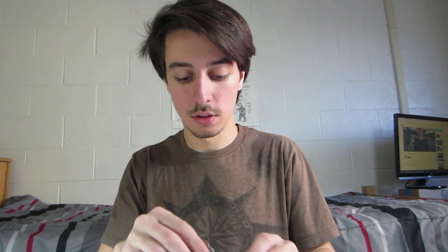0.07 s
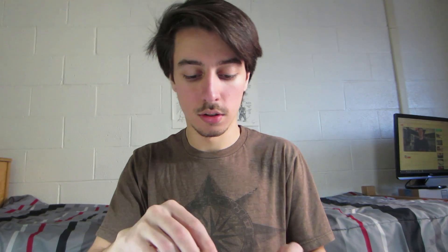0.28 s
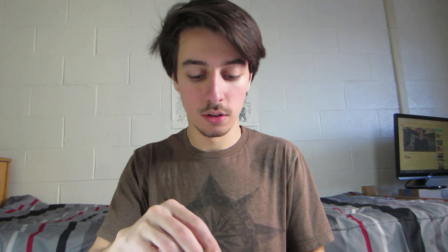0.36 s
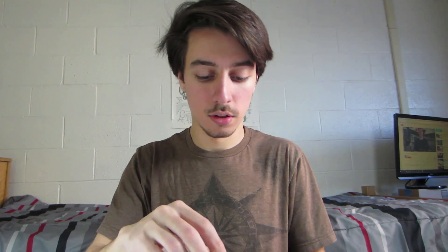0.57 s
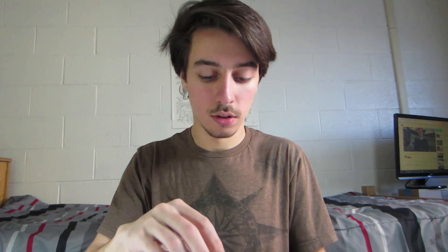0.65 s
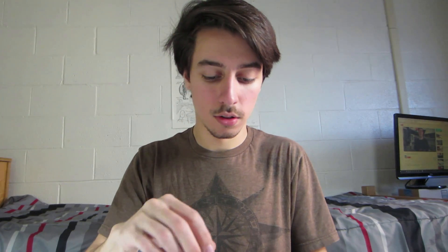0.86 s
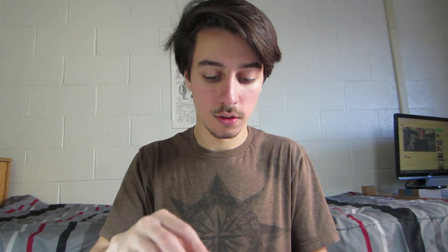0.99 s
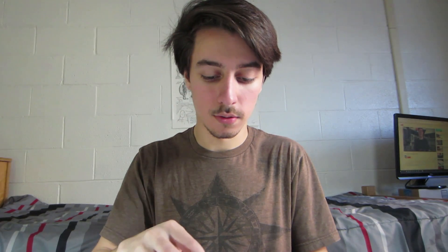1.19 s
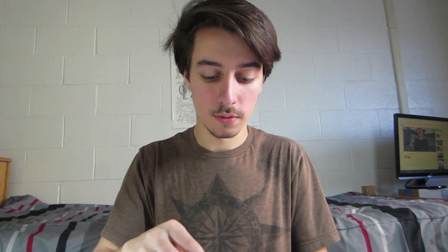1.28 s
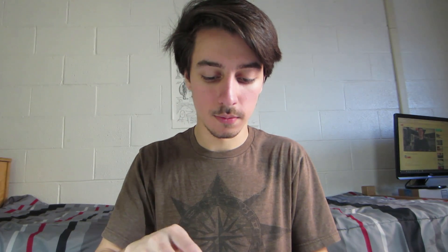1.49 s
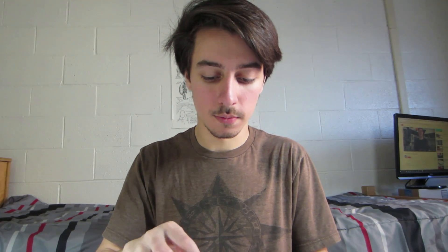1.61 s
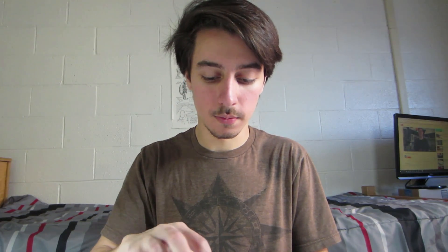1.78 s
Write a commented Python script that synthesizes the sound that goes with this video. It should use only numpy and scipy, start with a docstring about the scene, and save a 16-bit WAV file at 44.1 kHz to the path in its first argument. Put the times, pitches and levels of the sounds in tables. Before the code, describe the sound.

Coins drop into a plastic hopper with hollow knocks, bright clinks and short skids.

```python
"""Coins are slid along and dropped one at a time into a plastic hopper in a small room.
Each impact excites the damped modes of the plastic and the coin: a thump, a click, a high ring.
Between landings the coins skid and chatter, and friction drives a hollow resonance.
The microphone is close, a little to the left of the hopper, over faint room noise and hum."""
import sys
import numpy as np
from scipy import signal
from scipy.fft import rfft, irfft
from scipy.io import wavfile

SR = 44100
rng = np.random.default_rng(int(sys.argv[2]) if len(sys.argv) > 2 else 0)


def wav_out(sig):
    """Save sig, one row per channel (or a flat mono array), as 16-bit PCM at SR to the path in sys.argv[1]."""
    wavfile.write(sys.argv[1], SR, np.round(np.clip(np.atleast_2d(sig).T, -1, 1) * 32767).astype(np.int16))


N = 81585


def amp(db):
    """Decibels to amplitude ratio."""
    return 10 ** (np.asarray(db) / 20)


def unit(x):
    """Normalisation to rms 1."""
    return x / np.sqrt(np.mean(x ** 2) + 1e-20)


def read(points, hz):
    """Interpolation on a log-frequency axis."""
    f, value = np.transpose(points)
    return np.interp(np.log(hz + 1), np.log(f + 1), value)


def add(mix, start_s, sound):
    """Superposition of a delayed sound."""
    part = mix[max(round(start_s * SR), 0):][:len(sound)]
    part += sound[:len(part)]


def colour(x, spectrum, size=4096):
    """Minimum-phase filtering that preserves the power of white noise."""
    gain = unit(amp(read(spectrum, abs(np.fft.fftfreq(size, 1 / SR)))))
    log_response = np.conj(signal.hilbert(np.log(gain + 1e-6)))
    impulse = np.fft.ifft(np.exp(log_response)).real
    return signal.fftconvolve(x, impulse[:size // 2])[:len(x)]


def pair(a, b, correlation):
    """Partial coherence: two channels mixed from independent signals."""
    same = np.clip(read(correlation, np.fft.rfftfreq(len(a), 1 / SR)), -1, 1)
    return np.array([a, irfft(same * rfft(a) + np.sqrt(1 - same ** 2) * rfft(b), len(a))])


def burst(t, decay_s):
    """Exponentially decaying noise with the same energy in every draw."""
    env = np.exp(-t / decay_s)
    noise = env * rng.standard_normal(len(t))
    return noise * np.linalg.norm(env) / np.linalg.norm(noise)


def drift(t, rate_hz):
    """Random modulation: low-pass noise of rms 1."""
    hz = np.fft.rfftfreq(len(t), 1 / SR)
    return unit(irfft(rfft(rng.standard_normal(len(t))) / (1 + (hz / rate_hz) ** 4), len(t)))


def stroke(t, length, rise_s, fall_s):
    """Envelope with linear attack, hold and exponential release."""
    return np.minimum(t / rise_s, 1) * np.exp(-np.maximum(t - length, 0) / fall_s)


# room noise spectrum (frequency [Hz], relative level [dB])
NOISE_SPECTRUM = [(20, -13), (60, -9.5), (130, -8), (200, -5.5), (330, -4), (500, -8.5), (1000, -14),
                  (1300, -20.5), (1900, -27.5), (2800, -42), (4200, -40.5), (6000, -46), (7000, -66.5),
                  (14000, -71.5)]
# left-right likeness of the noise (frequency [Hz], correlation [ratio])
NOISE_CORRELATION = [(25, 0.74), (80, 0.93), (300, 0.96), (600, 0.79), (1200, 0.28), (8000, 0.313)]
def background():
    """Stationary low room noise, with two pure tones: a hum and an electrical whine."""
    shape = amp(read(NOISE_SPECTRUM, np.fft.rfftfreq(N, 1 / SR)))
    noise = irfft(rfft(rng.standard_normal((2, N))) * shape, N)
    phase_per_hz = 2 * np.pi * np.arange(N) / SR
    hum = amp(-62) * np.sin(584 * phase_per_hz)
    whine = amp(-67.5) * np.sin(7910 * phase_per_hz)
    return amp(-51) * unit(pair(*noise, NOISE_CORRELATION)) + hum + whine


# modes of the hopper (frequency [Hz], relative level [dB], T60 [s])
HOPPER_MODES = [(127.6, -5.5, 0.16), (217.7, -3, 0.4), (269.5, -3.5, .17), (358, -10, 0.35),
                (401, -7.5, 0.25), (498, -8.5, 0.17), (687, -16.5, 0.44), (834, -8, 0.068),
                (898, -11, 0.17), (1230, -14.5, 0.14)]
def hopper_knock(t, push_s=0.0006, flex_s=0.00058, rebound_s=0.0082):
    """Elastic response: the hopper's floor gives way and springs back while its modes decay."""
    modes = sum(amp(db - 60 * t / t60) * np.sin(2 * np.pi * hz * t) for hz, db, t60 in HOPPER_MODES)
    modes *= 1 - np.exp(-t / push_s)
    u, v = t / flex_s, np.maximum(t - rebound_s, 0) / flex_s
    flex = u * (2 - u) * np.exp(-u)
    rebound = amp(-1) * v * (2 - v) * np.exp(-v)
    return amp(-7.5) * modes + amp(6.52) * (flex + rebound)


def clink(t, count=6, low_hz=9400, high_hz=12000, decay_s=.004):
    """Impulse response of one coin: a direct click and a few brief high partials."""
    hz, phase = rng.uniform(low_hz, high_hz, (count, 1)), rng.random((count, 1))
    partials = np.sin(2 * np.pi * (hz * t + phase)).sum(0) * np.exp(-t / decay_s)
    band_share, gain = (high_hz - low_hz) / (SR / 2), amp(-2)
    response = gain * np.sqrt(band_share) * partials / np.linalg.norm(partials)
    response[0] += 1
    return response / np.sqrt(1 + gain ** 2)


# resonances of coins rubbing together (frequency [Hz], relative level [dB])
CLANK_MODES = [(2557, -2), (3252, -3), (3760, -2), (4600, -6), (5412, 2), (5900, -1.5)]
def clank(force, width_hz=140):
    """Forced vibration: contact drives the coins' midrange resonances."""
    t = np.arange(SR // 8) / SR
    ring = sum(amp(db) * np.sin(2 * np.pi * hz * t) for hz, db in CLANK_MODES)
    ring *= np.exp(-np.pi * width_hz * t)
    return signal.fftconvolve(force, ring / np.linalg.norm(ring))[:N]


# spectra of thump, clack and a coin's face (frequency [Hz], relative level [dB])
THUMP_SPECTRUM = [(20, -34.5), (60, -22.5), (130, 5.5), (260, 8.5), (480, -5), (900, -8.5), (1500, -23),
                  (3000, -67.5)]
CLACK_SPECTRUM = [(100, -21.5), (800, 4), (1700, -6), (2500, 5), (3600, -7.5), (5500, -2.5), (7000, -11.5),
                  (9000, -2), (13000, -10)]
METAL_SPECTRUM = [(1000, -47), (7000, -33), (9000, -2), (10000, -1), (10800, 1), (11100, -3), (11550, -1),
                  (12300, -1), (13200, -4.5)]
# coin impacts (time [s], thump level [dB], clack level [dB], tick level [dB])
IMPACTS = [(0.031, -53, -76, -46.5), (.172, -63, -56, -34), (0.2043, -16.5, -14.5, -26),
           (0.2124, -24.5, -37, -38.5), (0.219, -26.5, -41, -30.5), (0.2353, -25, -31, -33.5),
           (0.269, -41, -35.5, -31), (0.2975, -28.5, -31.5, -38), (0.337, -40.5, -41, -26.5),
           (0.4935, -33.5, -38, -39), (.505, -49.5, -38.5, -24.5), (0.519, -43.5, -41.5, -27.5),
           (0.569, -47, -57, -30.5), (0.605, -41, -41.5, -29), (0.6134, -36.5, -62.5, -36.5),
           (.713, -21.5, -22, -17), (.7215, -22.5, -34, -44.5), (0.785, -53.5, -33.5, -34.5),
           (0.812, -38.5, -34, -27.5), (1.182, -58, -45, -39), (1.2725, -38, -38.5, -32.5),
           (1.283, -43, -43, -27), (1.293, -38, -41, -32.5), (1.3, -38.5, -57.5, -29),
           (1.418, -50.5, -58, -45.5), (1.5, -66, -53.5, -45.5)]
def impacts(thump_s=0.0075, click_s=0.0018):
    """Impulsive excitation: each landing gives a knock, a dull thump, a clack and a metallic tick."""
    t = np.arange(SR // 2) / SR
    knock = hopper_knock(t)
    plastic, thump, clack, tick = np.zeros((4, N))
    for start, thump_db, clack_db, tick_db in IMPACTS:
        add(plastic, start, amp(thump_db) * knock)
        add(thump, start, amp(thump_db - 3.5) * burst(t, thump_s))
        add(clack, start, amp(clack_db) * burst(t, click_s))
        add(tick, start, amp(tick_db) * signal.fftconvolve(burst(t, click_s), clink(t)))
    metal = amp(-21.5) * clank(clack) + colour(tick, METAL_SPECTRUM)
    return plastic + colour(thump, THUMP_SPECTRUM) + colour(clack, CLACK_SPECTRUM) + metal


# resonances under a skidding coin (frequency [Hz], bandwidth [Hz], relative level [dB])
HOLLOW_MODES = [(690, 23, -6), (828, 57, 2.5), (908, 80, 6), (987, 30, 2)]
def hollow_resonance(force):
    """Resonant filtering: the narrower a mode's bandwidth, the longer it rings."""
    t = np.arange(SR // 4) / SR
    ring = sum(amp(db) * width * np.exp(-np.pi * width * t) * np.cos(2 * np.pi * hz * t)
               for hz, width, db in HOLLOW_MODES)
    ring = signal.sosfilt(signal.butter(2, [500, 1500], "band", fs=SR, output="sos"), ring)
    return signal.fftconvolve(force, ring / np.linalg.norm(ring))[:N]


# spectra of sliding contact (frequency [Hz], relative level [dB])
RUMBLE_SPECTRUM = [(20, -24.5), (70, -11.5), (125, -6), (350, -0.5), (520, -8.5), (800, -10), (2000, -30),
                   (9000, -99)]
SCRAPE_SPECTRUM = [(200, -39), (1100, 11), (1700, 12), (2600, 5.5), (3600, -2.5), (5000, 6), (6600, 1),
                   (9000, -8.5), (13000, -25.5)]
# skids (time [s], duration [s], rumble [dB], hollow ring [dB], scrape [dB], clank [dB], sizzle [dB])
COIN_SKIDS = [(0.094, 0.095, -73, -65, -72, -74, -50), (0.225, 0.017, -26, -29.5, -33.5, -40, -26.5),
              (0.251, 0.016, -51, -38.5, -54, -45, -38.5), (0.294, 0.06, -37, -39, -47.5, -58.5, -37.5),
              (0.488, 0.019, -41, -37, -44.5, -67, -40.5), (0.511, 0.028, -35.5, -41, -50, -56.5, -41.5),
              (.55, 0.059, -53.5, -42.5, -52, -75, -55), (0.726, 0.03, -33, -45, -46.5, -56.5, -43.5),
              (.787, 0.023, -40.5, -40, -52, -72, -61.5), (0.825, 0.043, -39.5, -42, -50.5, -63, -45.5),
              (1.146, 0.053, -45.5, -43, -59.5, -75.5, -63),
              (1.186, 0.094, -46.5, -48.5, -53.5, -62.5, -51), (1.272, 0.035, -42, -39, -49.5, -60, -43),
              (1.304, 0.015, -51.5, -49, -59, -57, -45), (1.403, 0.057, -47.5, -48.5, -61, -74.5, -58),
              (1.496, 0.0067, -49.5, -42.5, -77, -70.5, -53.5)]
def skids(knocks_per_s=2200, spread_db=2):
    """Friction as shot noise: a swarm of tiny random knocks drives the plastic and the metal."""
    t, forces = np.arange(SR // 4) / SR, np.zeros((5, N))
    for start, length, *levels_db in COIN_SKIDS:
        env = stroke(t, length, rise_s=0.00608, fall_s=0.0081)
        strength = amp(spread_db * np.minimum(rng.exponential(1, len(t)), 4))
        strength *= rng.random(len(t)) < knocks_per_s / SR
        knocks = [amp(db) * env * unit(strength * rng.choice([-1., 1.], len(t))) for db in levels_db]
        knocks[-1] = signal.fftconvolve(knocks[-1], clink(t))  # sizzle carries the coin's partials
        for layer, sound in zip(forces, knocks):
            add(layer, start, sound)
    rumble, hollow, scrape, rubbing, sizzle = forces
    return (colour(rumble, RUMBLE_SPECTRUM) + hollow_resonance(hollow)
            + colour(scrape, SCRAPE_SPECTRUM) + clank(rubbing) + colour(sizzle, METAL_SPECTRUM))


# coins left ringing (time [s], frequency [Hz], level [dB])
FREE_RINGS = [(.2045, 10900, -29.5), (.229, 10680, -27.5), (.252, 10600, -32.5), (0.297, 11070, -29),
              (.492, 11660, -36.5), (.514, 10910, -28.5), (0.743, 12130, -47), (.8115, 10770, -38.5),
              (1.283, 10800, -32), (1.296, 10770, -45)]
def rings(t60_s=.12, flutter_depth=.45, flutter_hz=110):
    """Free vibration: a bouncing coin holds one high note, which flutters as it tumbles."""
    t, out = np.arange(SR // 2) / SR, np.zeros(N)
    for start, hz, db in FREE_RINGS:
        flutter = 1 + flutter_depth * (drift(t, flutter_hz) + 1j * drift(t, flutter_hz))
        tone = (flutter * np.exp(2j * np.pi * hz * t)).imag
        add(out, start, amp(db - 60 * t / t60_s) * tone)
    return out


# dull taps of a coin's rim (time [s], frequency [Hz], level [dB])
RIM_TAPS = [(.2349, 774, -18), (.2865, 870, -25.5), (.7915, 750, -24.5), (1.605, 426, -39.5)]
def taps(rise_s=.0007):
    """Heavily damped oscillation: a rim meets the plastic with a knock of two or three cycles."""
    t, out = np.arange(SR // 20) / SR, np.zeros(N)
    env = t / rise_s * np.exp(1 - t / rise_s)
    for start, hz, db in RIM_TAPS:
        add(out, start, amp(db) * env * np.sin(2 * np.pi * hz * t))
    return out


# a coin's edge juddering on the plastic (time [s], duration [s], frequency [Hz], level [dB])
EDGE_JUDDERS = [(0.491, 0.012, 906, -29.5), (.512, 0.0073, 870, -33.5), (0.558, 0.015, 950, -34.5),
                (.574, 0.015, 940, -30), (0.599, 0.0095, 927, -39), (0.804, 0.025, 972, -42),
                (1.27, 0.006, 917, -31.5), (1.283, 0.01, 816, -34), (1.492, 0.013, 953, -45.5)]
def judders(wobble_depth=0.024, wobble_hz=91):
    """Stick-slip oscillation: a coin's edge sings briefly near the hollow resonance."""
    t, out = np.arange(SR // 4) / SR, np.zeros(N)
    for start, length, hz, db in EDGE_JUDDERS:
        cycles = np.cumsum(hz * (1 + wobble_depth * drift(t, wobble_hz))) / SR
        env = stroke(t, length, rise_s=0.0028, fall_s=0.0032)
        add(out, start, amp(db) * env * np.sin(2 * np.pi * cycles))
    return out


# reverberation time (frequency [Hz], T60 [s])
TAIL_T60 = [(100, 0.57), (500, 0.23), (2000, 0.35), (6000, 0.24), (12000, 0.14)]
# left-right likeness of the tail (frequency [Hz], correlation [ratio])
TAIL_CORRELATION = [(100, .99), (300, .98), (600, .8), (1200, .5), (3000, .15), (6000, -.1), (12000, .25)]
# early reflections (frequency [Hz], relative level [dB])
SCATTER_SPECTRUM = [(250, -49), (500, -28), (900, -1), (3000, 10.5), (11000, 4)]
def room(x, tail_db, scatter_db=-6, delay_s=0.007):
    """Reverberation: early scatter off the desk and hopper walls, then a short diffuse tail."""
    hz, t, noise = signal.stft(rng.standard_normal((2, SR // 2)), SR, nperseg=256)
    tail = signal.istft(noise * amp(-60 * t / read(TAIL_T60, hz)[:, None]), SR)[1]
    t = np.arange(tail.shape[1]) / SR
    build_up = np.clip(t / delay_s - 1, 0, 1)
    tail = pair(*(tail * build_up), TAIL_CORRELATION)
    scatter = np.array([colour(burst(t, decay_s=.007), SCATTER_SPECTRUM) for side in range(2)])
    response = amp(tail_db) * tail / np.linalg.norm(tail[0])
    response += amp(scatter_db) * scatter / np.linalg.norm(scatter[0])
    response[:, 0] += 1  # direct sound
    return signal.fftconvolve(x[None], response, axes=1)[:, :N]


# stereo balance (frequency [Hz], left minus right level [dB])
BALANCE = [(200, .1), (500, .2), (950, 1.4), (2800, -2.4), (5500, -2.9), (11000, -1.1)]
# lag of the left side (frequency [Hz], phase [rad])
LEFT_PHASE_LAG = [(450, 0), (950, .37), (3000, .37), (5500, .5), (11000, 1.25)]
def scene():
    """Localisation by level and phase: the coins' sound reaches the right side slightly earlier."""
    struck = room(impacts() + taps() + judders(), tail_db=-13)
    sustained = room(rings() + skids(), tail_db=-9)
    left, right = rfft(struck + sustained)
    hz = np.fft.rfftfreq(N, 1 / SR)
    lean = amp(read(BALANCE, hz) / 2)
    lag = np.exp(-1j * read(LEFT_PHASE_LAG, hz))
    return irfft(np.array([left * lean * lag, right / lean]), N) + background()


# microphone response (frequency [Hz], gain [dB])
MIC_RESPONSE = [(7000, -2), (7600, -21.5), (8400, -23.5), (9100, -5), (12400, 0.5), (13000, -29.5),
                (14000, -38)]
def record(dry, cutoff_hz=13910):
    """Linear filtering: the microphone's deep treble notch, then a low-pass band limit."""
    pad = SR // 10
    padded = np.pad(dry, ((0, 0), (pad, pad)), "reflect", reflect_type="odd")
    size = padded.shape[1]
    gain = amp(read(MIC_RESPONSE, np.fft.rfftfreq(size, 1 / SR)))
    coloured = irfft(rfft(padded) * gain, size)
    lowpass = signal.firwin(255, cutoff_hz, window=("kaiser", 9), fs=SR)
    return signal.oaconvolve(coloured, lowpass[None], "same")[:, pad:pad + N]


dry = scene()
out = record(dry)
wav_out(out)
```